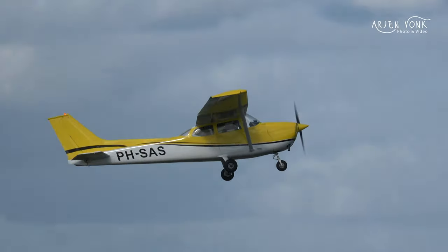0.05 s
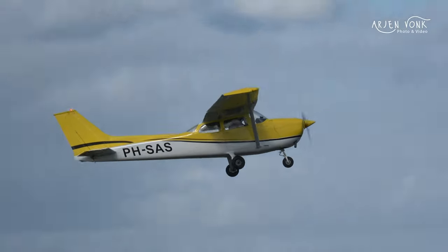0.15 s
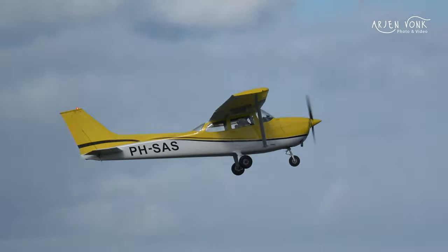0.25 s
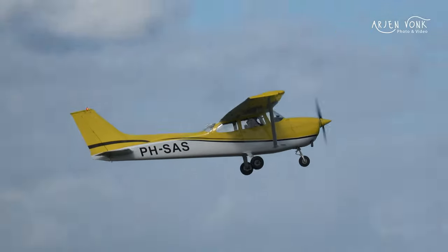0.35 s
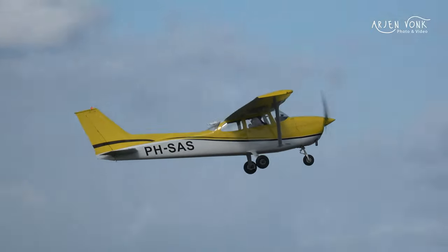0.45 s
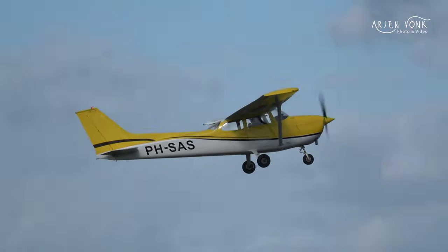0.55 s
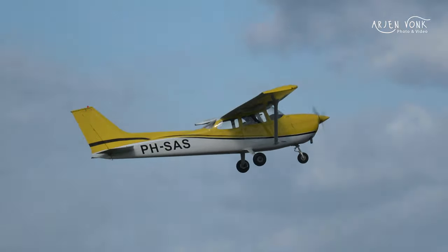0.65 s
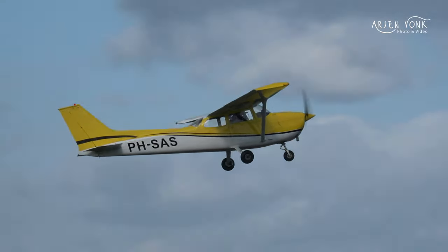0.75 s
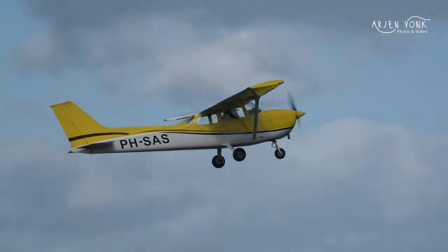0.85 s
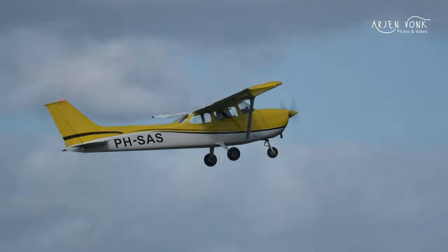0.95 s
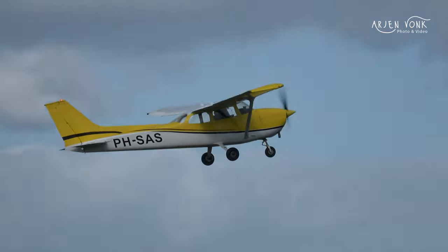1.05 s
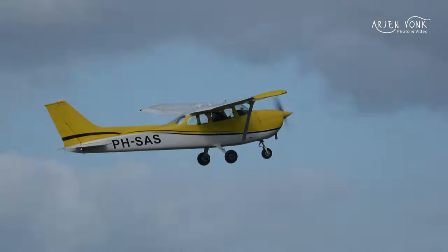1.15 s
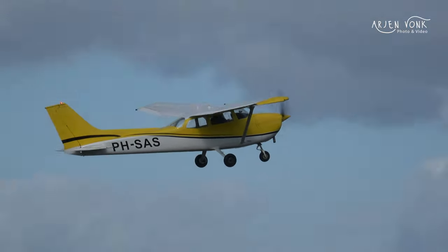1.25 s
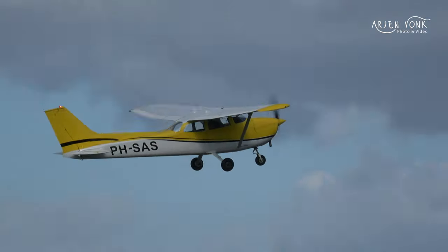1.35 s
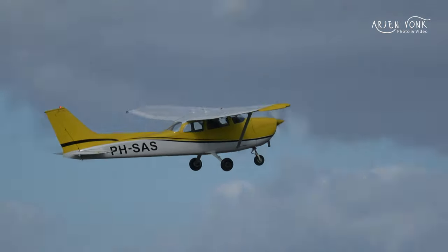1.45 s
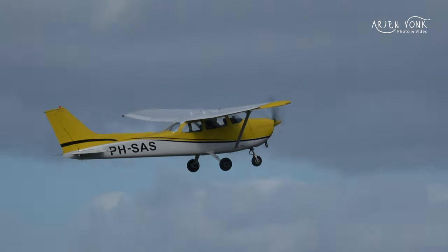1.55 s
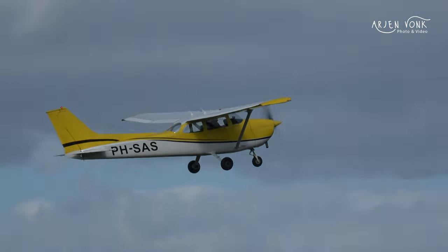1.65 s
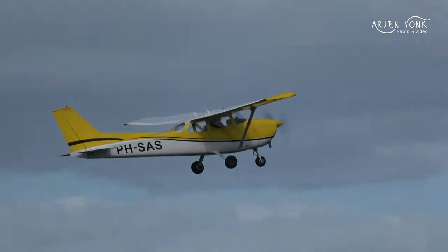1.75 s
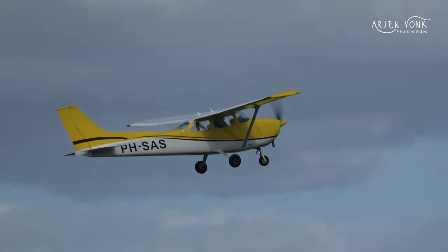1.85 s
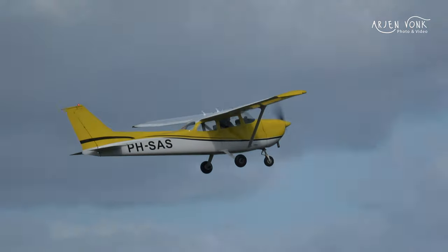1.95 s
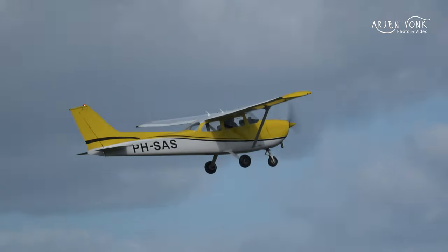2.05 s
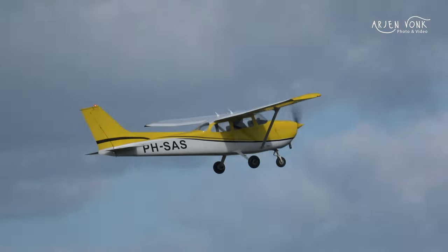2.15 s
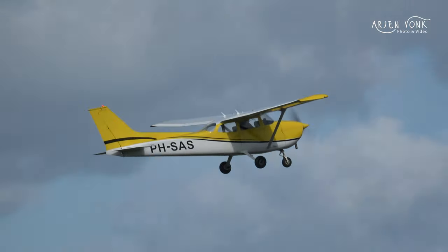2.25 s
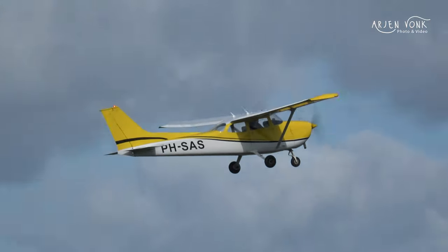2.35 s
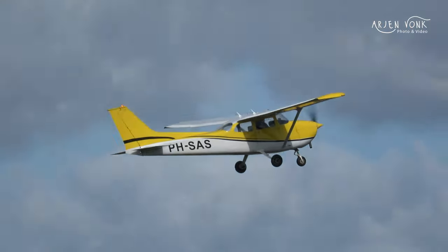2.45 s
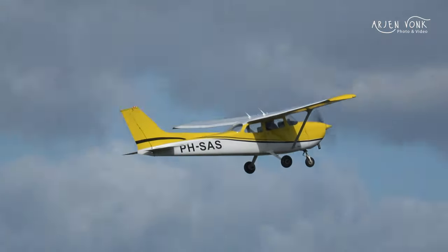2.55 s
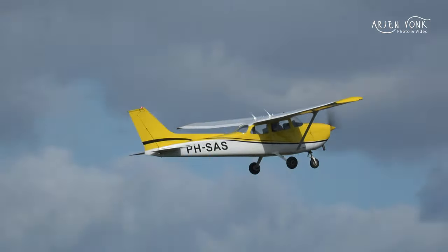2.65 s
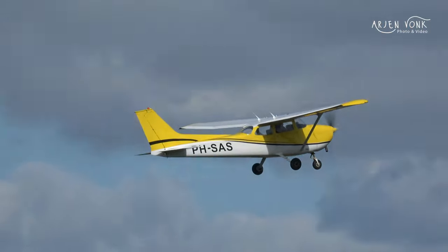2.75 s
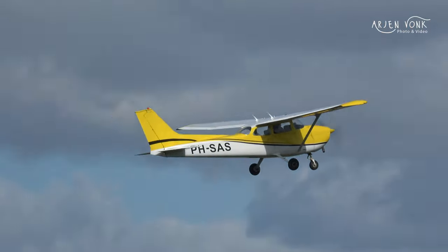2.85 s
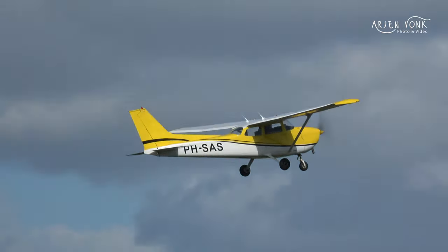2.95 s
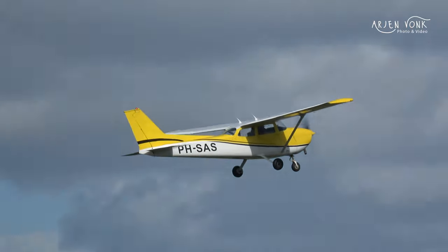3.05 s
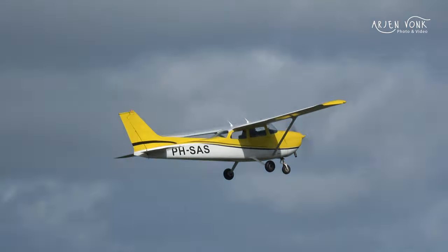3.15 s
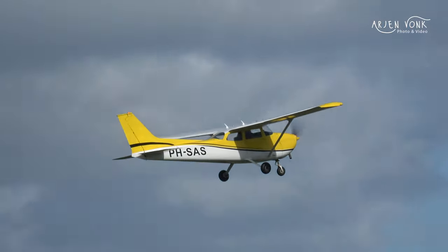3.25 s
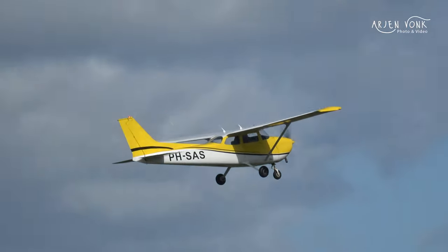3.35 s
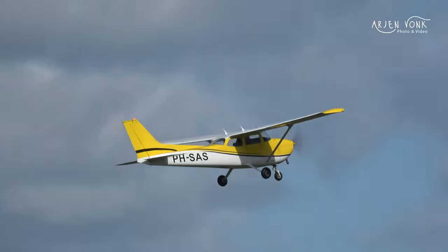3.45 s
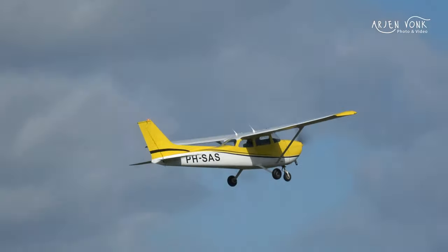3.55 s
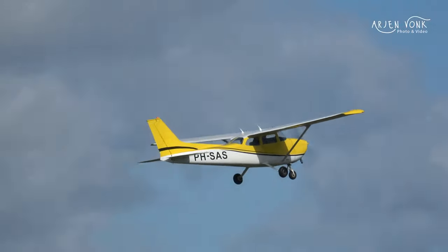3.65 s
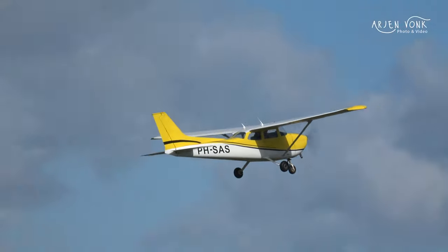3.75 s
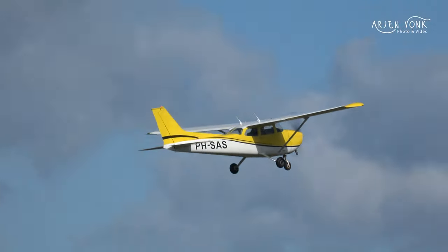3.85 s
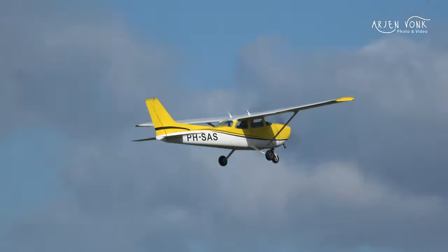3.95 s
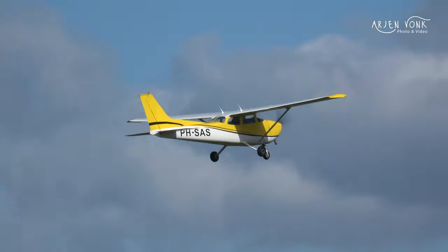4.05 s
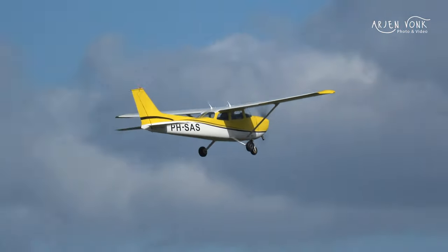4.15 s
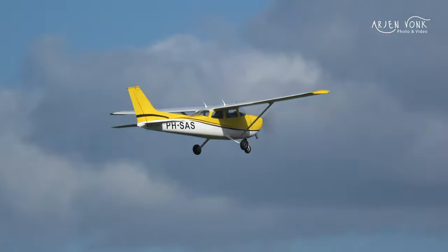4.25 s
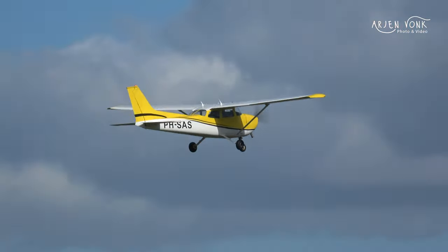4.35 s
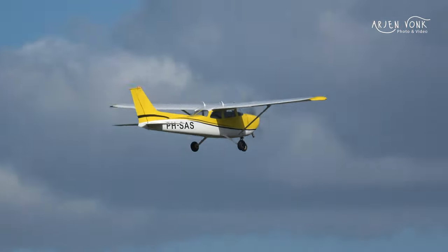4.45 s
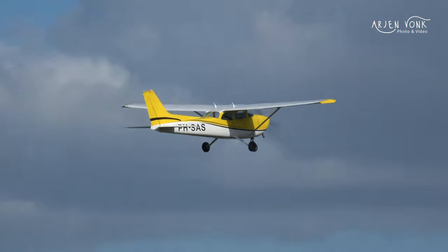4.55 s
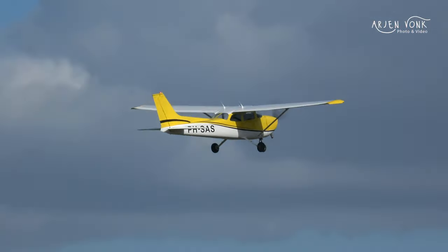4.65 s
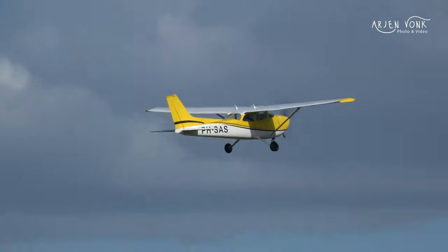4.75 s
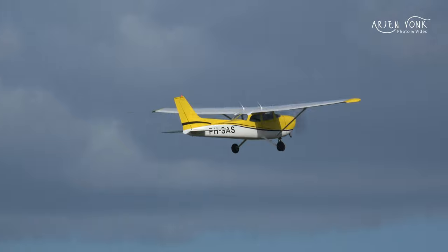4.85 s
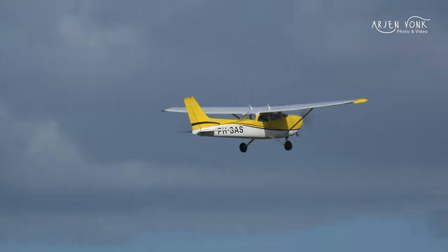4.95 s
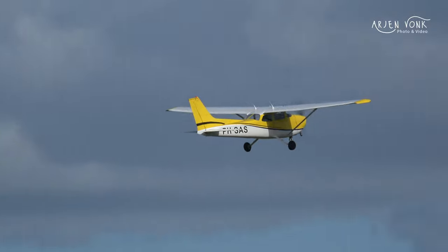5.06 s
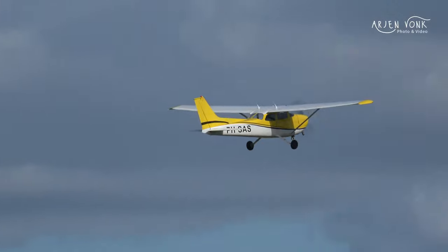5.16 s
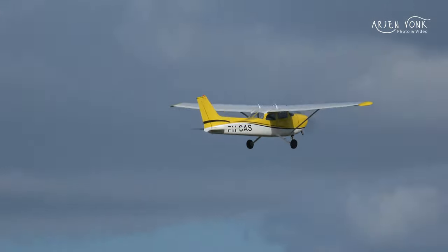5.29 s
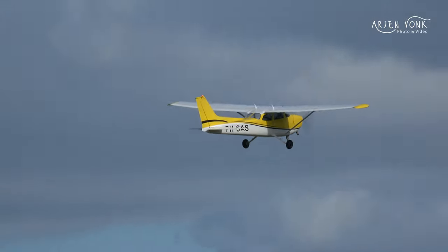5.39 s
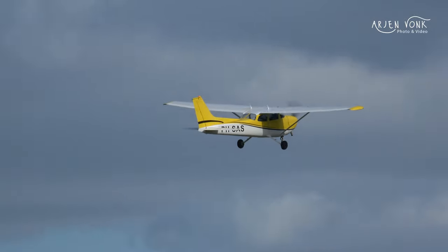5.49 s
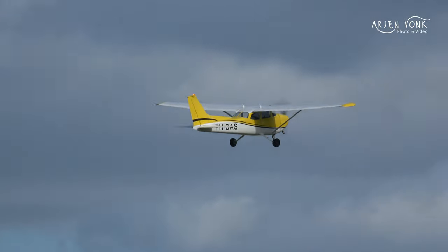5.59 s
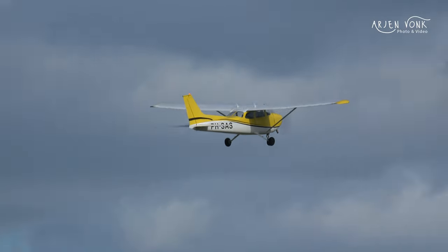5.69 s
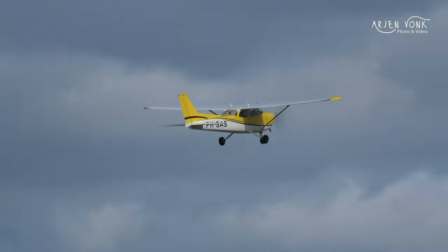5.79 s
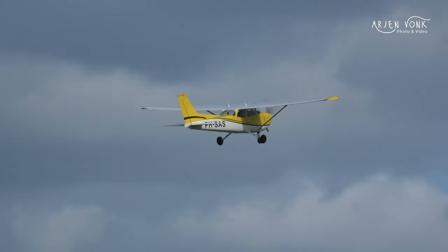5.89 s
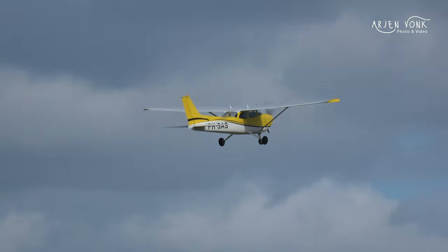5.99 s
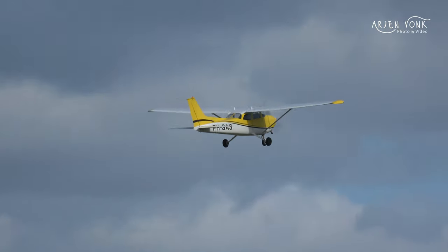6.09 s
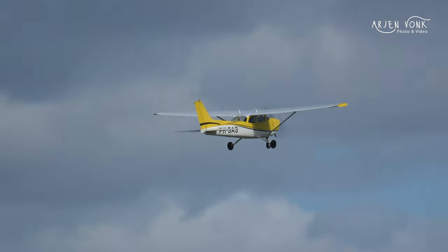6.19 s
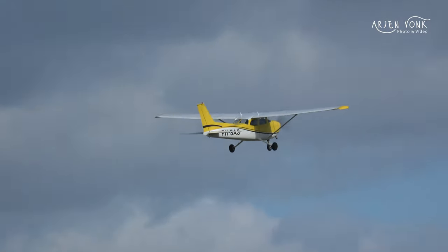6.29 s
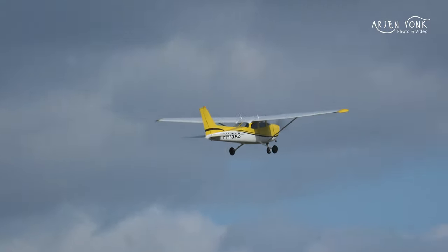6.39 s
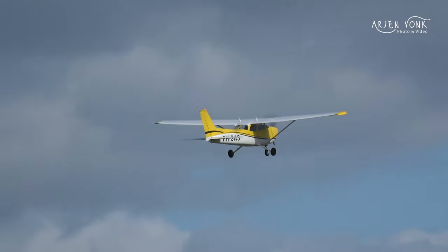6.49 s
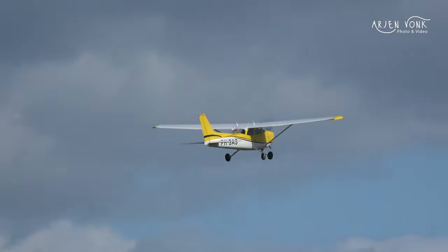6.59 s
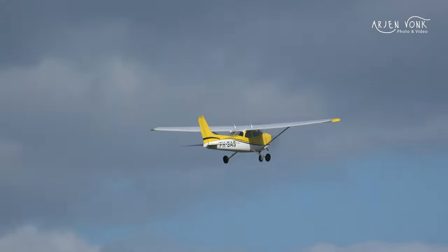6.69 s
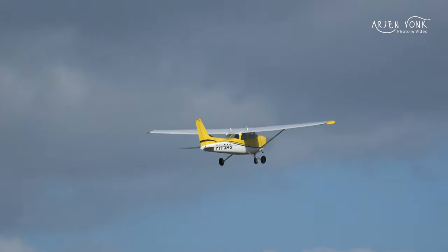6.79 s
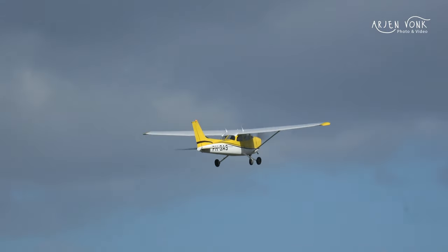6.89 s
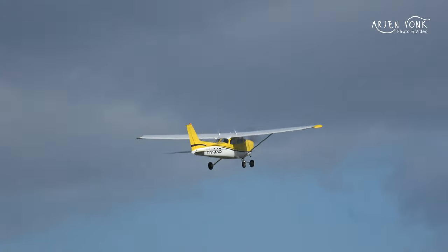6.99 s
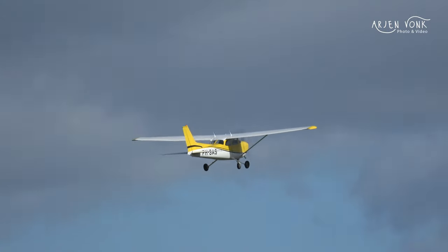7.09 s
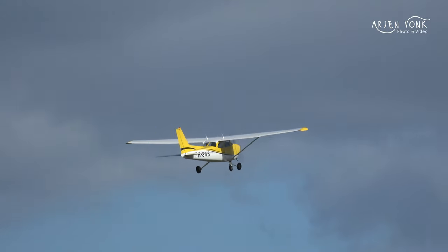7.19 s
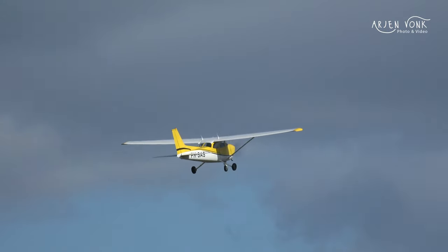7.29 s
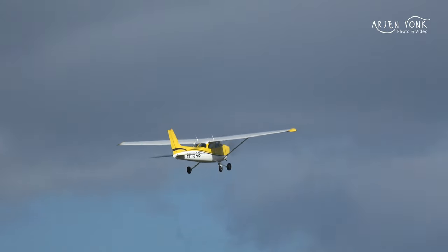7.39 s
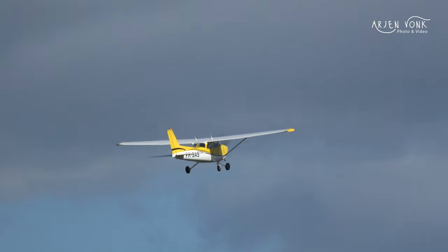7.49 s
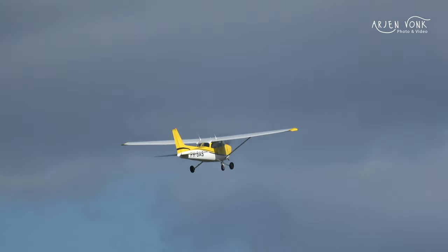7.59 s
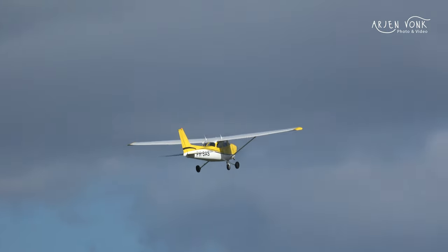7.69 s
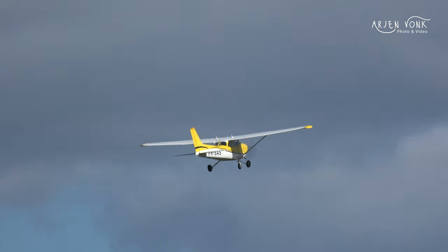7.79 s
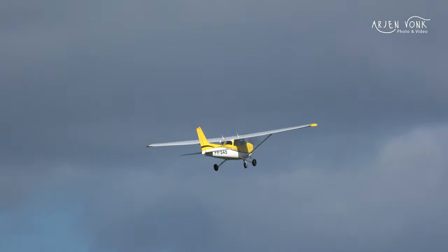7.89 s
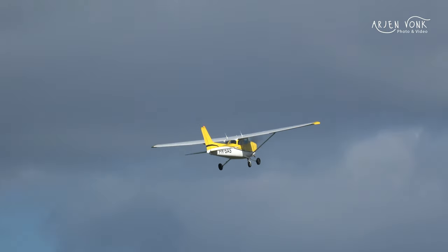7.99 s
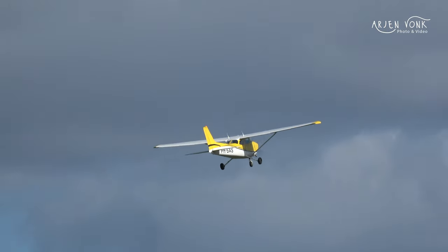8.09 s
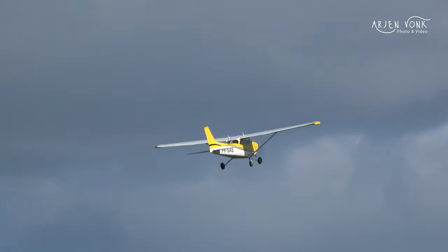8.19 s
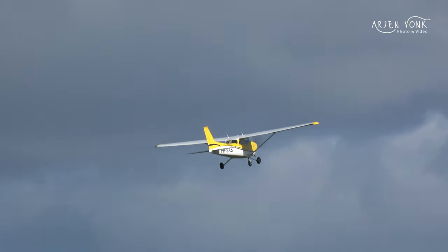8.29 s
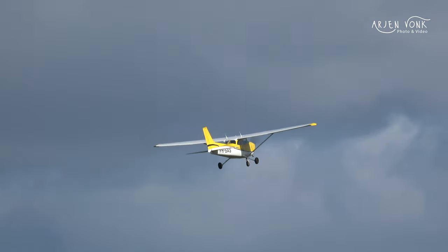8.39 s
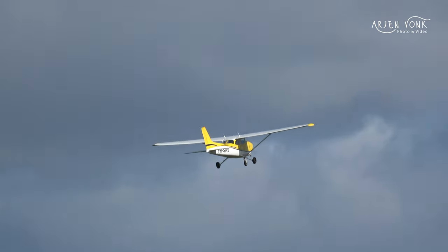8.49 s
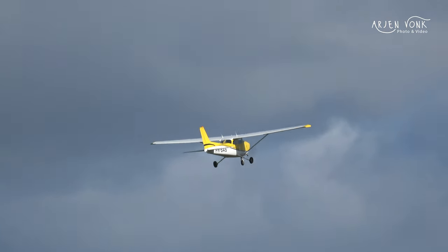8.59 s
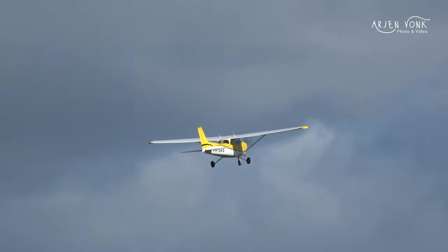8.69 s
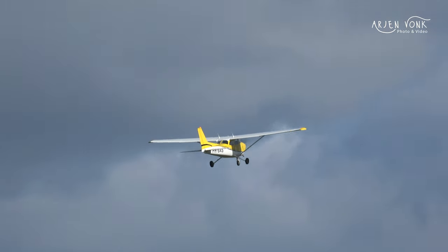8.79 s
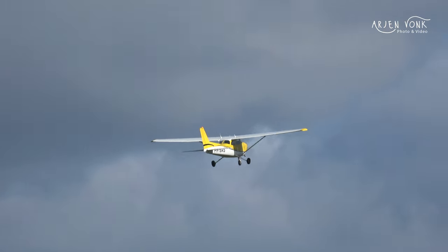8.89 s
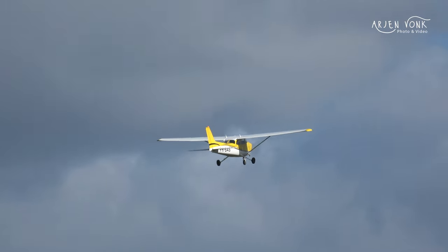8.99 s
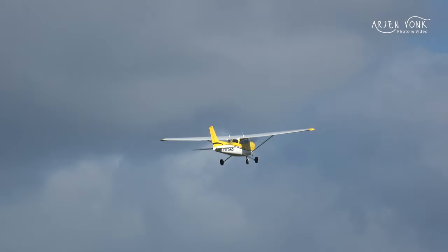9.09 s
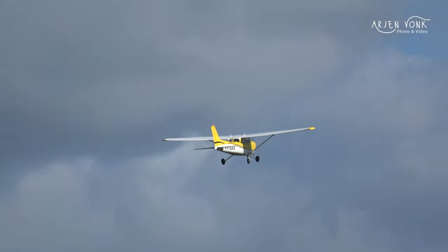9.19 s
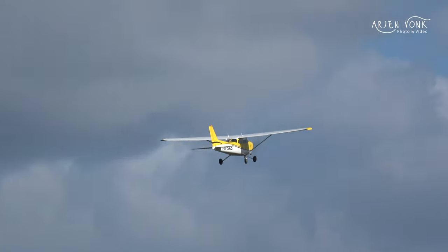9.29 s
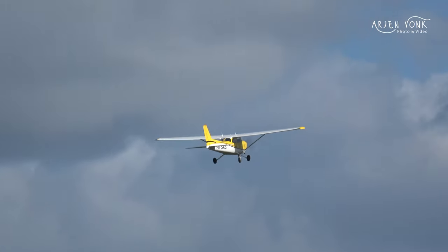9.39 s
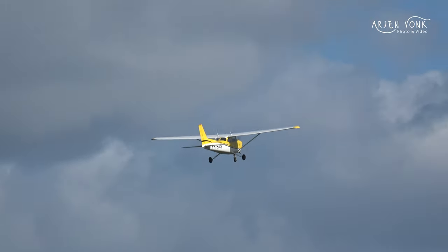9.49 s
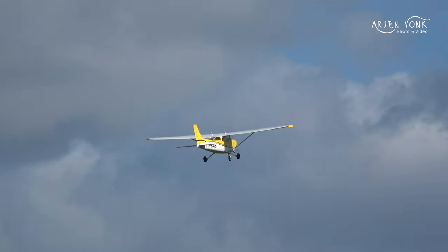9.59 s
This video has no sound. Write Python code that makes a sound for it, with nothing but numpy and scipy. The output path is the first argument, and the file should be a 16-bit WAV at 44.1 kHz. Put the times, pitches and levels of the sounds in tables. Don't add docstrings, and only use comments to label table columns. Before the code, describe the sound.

Loud, rough propeller-plane drone with crackling exhaust passes nearby outdoors, then steadily recedes, wavering in gusty air over faint low wind rumble.

```python
import sys
import numpy as np
from scipy import signal
from scipy.io import wavfile
from scipy.ndimage import uniform_filter1d

SR = 44100
rng = np.random.default_rng(int(sys.argv[2]) if len(sys.argv) > 2 else 0)


def ratio_of_db(decibels):
    return 10 ** (np.asarray(decibels, float) / 20)


def store_pcm(level_fs):
    pcm = np.round(np.clip(level_fs, -1, 1) * 32767).astype(np.int16)
    wavfile.write(sys.argv[1], SR, np.atleast_2d(pcm).T)


N = 425124
STEP = 16

# (time [s], rate [Hz])
BLADE_RATE = [(0.0, 82.8), (1.0, 81.34), (1.5, 80.14), (2.0, 79.81), (3.0, 78.6), (4.5, 76.98), (5.0, 76.6),
              (6.0, 76.69), (7.0, 76.96), (8.0, 76.77), (9.0, 76.03), (9.64, 75.44)]
# (time [s], first harmonic [dB], second re first [dB], higher re first [dB])
HUM = [(0, -15.5, -18.5, -22), (.55, -15.3, -9, -21.5), (.85, -15, -9.5, -23.5), (1.05, -17, -8, -20.5),
       (1.8, -17.5, -4.5, -20.5), (2.3, -19, -15, -26.5), (2.6, -18.5, -9.5, -18), (3.0, -16.5, -9.5, -27),
       (3.7, -17.5, -14.5, -24.5), (4.25, -25, -7, -26), (4.6, -23.5, -14, -16.5), (4.9, -24, -22, -19.5),
       (5.6, -27.5, -12, -23.5), (6.2, -28, -17, -19), (6.7, -31.5, -11.5, -18), (7.2, -29.5, -14, -20),
       (8.0, -33.5, -13, -11.5), (9.64, -34.5, -14, -19)]
# (multiple [-], abeam [dB], from behind [dB])
HIGHER_HARMONICS = [(3, -5.5, 4), (4, 5.5, -1), (5, 2, 4.5), (6, 13.5, -12), (7, -2, 3.5), (8, -6.5, -3.5),
                    (9, -4.5, -11.5), (10, -4, -13.5)]
# (time [s], share [0-1])
AWAY = [
    (0, 0.25),
    (3.6, 0.6),
    (5.4, 0.62),
    (9.64, 1),
]
# (time [s], level [dB])
EXHAUST_LEVEL = [(0, -25.5), (2, -25.5), (4.6, -26.5), (5.4, -32.5), (7.6, -37.5), (9.64, -41.5)]
# (frequency [Hz], abeam [dB], from behind [dB])
EXHAUST_COLOUR = [(101, -17.5, -19), (184, -24.5, -16), (345, -11.5, -5.5), (513, -8, -3.5),
                  (623, -2.5, -4), (865, -12, -0.5), (1090, -6.5, -2.5), (1260, -7.5, -14.5),
                  (1590, -9, -10), (1840, -1, -3.5), (2500, -7, -2.5), (3520, -1.5, 0.5), (5270, 0.5, -1),
                  (9300, -23, -21.5)]
# (frequency [Hz], width [Hz], abeam [dB], from behind [dB])
PIPE_MODES = [(564.8, 25, -13.5, -5.5), (633.6, 27.3, -6.5, -7), (778, 55, -20, -10), (1195, 210, 1.5, -21),
              (1320, 83, -19.5, -12), (1887, 42, -9, -17.5), (3063, 70, -10.5, -14.5),
              (3684, 250, -17, -3.5)]
CYLINDER_DB = [-1.92, -3, -3, -2.5]
REGISTERS_HZ = [
    250,
    680,
    1500,
    3100,
    5200,
]
# (abeam [dB], air loss when far [dB], share of gusts [-])
UPPER_REGISTERS = [
    (-2.5, 3.6, 1.62),
    (-8.5, -10, 1.08),
    (-32.5, -11.5, 1),
]
# (time [s], peak [dB])
POPS = [(0.064, -11), (0.137, -6), (0.332, -1), (0.503, -5.5), (0.575, -12), (0.857, -7), (1.115, -21),
        (1.462, -9), (1.512, -2), (1.624, -10), (1.763, -5.5), (2.413, -13), (2.564, -10), (2.667, -10.5),
        (2.727, -20), (2.843, -14), (2.92, -2), (3.328, -10), (3.481, -8.5), (3.583, -9.5), (3.686, -8),
        (3.995, -18), (4.177, -21), (4.357, -13), (4.462, -11), (4.514, -8), (4.619, -3.5), (4.71, -7),
        (4.878, -10.5), (7.332, -14.5)]
# (time [s], half length [s], low swell [dB], high swell [dB])
GUSTS = [(0.0, 0.063, -12, -1.9), (0.5, 0.037, 4.5, -3), (0.86, 0.078, 8, 4), (1.06, 0.061, -6, -5.5),
         (1.34, 0.062, -7, -7.5), (1.5, 0.022, -4, 5), (1.6, 0.017, -1.8, -3.5), (2.28, 0.086, -8, -6.5),
         (2.54, 0.03, 1.5, -2.7), (2.7, 0.097, -1.8, -4.5), (2.94, 0.029, 1.5, 4.0),
         (3.16, 0.053, -2.0, -7), (3.62, 0.03, -5, -1.8), (3.9, 0.069, -7, -4.5), (4.14, 0.094, -4, 3),
         (4.32, 0.1, 1.5, -5.5), (4.86, 0.1, 0.6, -2), (5.12, 0.14, -10, -3.5), (5.32, 0.026, -6.1, 2),
         (5.7, 0.03, -8, -4.5), (5.96, 0.036, -1, 0), (6.22, 0.26, 2.6, 0.5), (6.52, 0.29, -6.5, -3),
         (6.88, 0.14, 8, 0), (7.52, 0.11, 6, -3.3), (7.72, 0.22, 3.2, 6), (8.1, 0.24, -8, -3),
         (8.32, 0.13, -1, 3), (8.58, 0.068, -3.5, -2.2), (9.18, 0.093, -5, -2)]
# (time [s], half length [s], frequency [Hz], swell [dB])
BAND_SWELLS = [(0.736, 0.23, 820, -6.5), (1.342, 0.041, 1400, 15), (1.89, 0.09, 880, 5.5),
               (2.05, 0.26, 2070, -5), (2.42, 0.14, 2150, 7), (2.625, 0.091, 241, 8.5), (2.842, 0.05, 910, 5.8),
               (2.975, 0.043, 610, 5.5), (2.982, 0.41, 6400, 9.5), (3.32, 0.055, 1840, -4.5),
               (3.54, 0.039, 460, -5.8), (3.76, 0.058, 2430, -6), (4.178, 0.082, 1250, -15.5),
               (4.277, 0.23, 2130, 3.5), (4.69, 0.045, 2130, -11), (4.693, 0.1, 265, -10), (4.748, 0.2, 305, -5),
               (4.79, 0.25, 4200, 4), (4.95, 0.035, 2410, -9), (5.395, 0.12, 700, -7), (5.547, 0.33, 230, 8.5),
               (5.582, 0.054, 400, -14), (5.796, 0.37, 3240, 5), (6.32, 0.1, 1210, -6), (6.947, 0.12, 1480, 12),
               (8.29, 0.09, 3200, -3.5), (8.437, 0.039, 540, -16), (8.55, 0.27, 1210, 7.5), (9.3, 0.28, 2360, 3),
               (9.35, 0.034, 810, -5.5)]
# (time [s], extra path [ms], strength [0-1], low-angle colouring [0-1])
GROUND_ECHO = [(0, 1.34, 0.6, 0.017), (.8, 1.35, 0.24, 0.066), (2.2, 2.07, 0.34, 0.34),
               (3.0, 1.49, 0.14, 0.067), (5.2, 1.66, 0.15, 0.34), (5.9, 1.6, 0.2, 1),
               (7.7, 1.475, 0.16, 0.84), (8.4, 2.3, 0.11, 0), (9.64, 2.24, 0.14, 0.031)]
# (time [s], half length [s], swell [dB])
BUFFETS = [(0.14, 0.04, -10), (0.48, 0.11, -13.5), (0.86, 0.044, -9), (1.8, 0.04, 11), (2.16, 0.03, 12),
           (2.5, 0.094, 7.3), (2.98, 0.18, 3), (3.36, 0.04, 4), (3.58, 0.04, -4), (4.38, 0.12, -8),
           (4.76, 0.087, 5), (4.96, 0.12, 4.5), (5.18, 0.056, 1), (5.64, 0.032, 1), (5.74, 0.07, 2),
           (6.46, 0.082, -1), (6.92, 0.028, 2.5), (7.06, 0.04, -11), (7.58, 0.013, 7), (7.7, 0.055, 0.5),
           (7.98, 0.07, -0.5), (8.68, 0.087, -2)]
# (time [s], peak [dB])
TICKS = [(5.023, -46.5)]


def propeller(turns, away, gust_db):
    first_db, second_db, higher_db = in_time(HUM)
    angle = 2 * np.pi * turns
    flutter_db = (-0.16 + 4.0 * away ** 3) * drift(5.5)
    out = ratio_of_db(first_db + flutter_db) * np.cos(angle)
    out += ratio_of_db(first_db + second_db + 0.97 * drift(2.2)) * np.cos(2 * angle + 0.4)
    for harmonic, (multiple, near_db, far_db) in enumerate(HIGHER_HARMONICS, start=3):
        aspect_db = near_db + away * (far_db - near_db)
        level_db = first_db + higher_db + 0.29 * gust_db + aspect_db + 1.2 * drift(0.8)
        bent = coarse_gain(0.76 * band_swells(89.0 * multiple))
        phase = harmonic * (angle + 0.9) + 0.55 * drift(1.5)
        out += bent * ratio_of_db(level_db) * np.cos(phase)
    return np.sqrt(2) * out


def firings(turns, away):
    opened = turns + 0.39 + 0.5
    cycle = np.cos(2 * np.pi * opened) + 0.08 * np.sin(4 * np.pi * opened)
    return opened.astype(int), -(6.8 - 5.2 * away ** 2) * cycle


def exhaust_levels(away, low_gust_db, high_gust_db):
    plane_db = in_time(EXHAUST_LEVEL)[0]
    growl_db = -26 + 0.43 * (plane_db - plane_db[0]) + 0.22 * low_gust_db
    bark_db = plane_db + 0.77 * low_gust_db
    upper_db = [plane_db + near_db + air_db * away ** 2 + share * high_gust_db
                for near_db, air_db, share in UPPER_REGISTERS]
    return growl_db, bark_db, *upper_db


def cylinder_strength(firing):
    chance_db = 1.49 * rng.standard_normal(firing[-1] + 1)
    return uniform_filter1d(np.array(CYLINDER_DB)[firing % 4] + chance_db[firing], size=150)


def jet(firing, swell_db, away, levels_db):
    white, body, fizz = rng.standard_normal((2, N)), 0, 0
    firing, swell_db, away = firing[::STEP], swell_db[::STEP], away[::STEP]
    levels_db = [level[::STEP] for level in levels_db]
    colour_hz, colour_near_db, colour_far_db = np.transpose(EXHAUST_COLOUR)
    edges_hz = np.geomspace(100, 10500, 24)
    for k, pair_hz in enumerate(zip(edges_hz, edges_hz[1:])):
        hz = np.mean(pair_hz)
        near_db = np.interp(np.log(hz), np.log(colour_hz), colour_near_db)
        far_db = np.interp(np.log(hz), np.log(colour_hz), colour_far_db)
        flicker_db = 2.0 * rng.standard_normal(firing[-1] + 1)[firing]
        patch_db = 2.02 * drift(4.34, step=STEP) + uniform_filter1d(flicker_db, size=9)
        level_db = register(levels_db, hz) + near_db + away * (far_db - near_db) + patch_db
        pulse_db = swell_db * min(hz / 610.0, 1)
        band = rms_one(butter(white[k % 2], pair_hz, "band", order=2)) * coarse_gain(pulse_db + level_db)
        if hz > 4600:
            fizz = fizz + band
        else:
            body = body + band
    fizz = butter(fizz, 5100.0, "high", order=6)
    return body, butter(fizz, 9000.0, "low", order=4)


def tailpipe(firing, swell_db, away, levels_db):
    at = np.flatnonzero(np.diff(firing))
    chance = rng.standard_normal((len(at), len(PIPE_MODES), 2))
    rush, out = 0.045 * ratio_of_db(swell_db) * rng.standard_normal(N), 0
    away, levels_db = away[::STEP], [level[::STEP] for level in levels_db]
    for k, (hz, width_hz, near_db, far_db) in enumerate(PIPE_MODES):
        scatter_s = 0.00015 + hz * 3e-7
        arrival = at + SR * (0.0035 + scatter_s * chance[:, k, 0])
        knocks = rush.copy()
        knocks[np.clip(arrival, 0, N - 1).astype(int)] += ratio_of_db(3.4 * chance[:, k, 1])
        aspect_db = near_db + away * (far_db - near_db)
        level_db = register(levels_db, hz) + aspect_db + 2.53 * drift(3.0, step=STEP)
        ring = resonance(resonance(knocks, hz, 2.5 * width_hz), hz, 2.02 * width_hz)
        out = out + coarse_gain(level_db) * rms_one(ring)
    return out


def pops():
    knocks = np.full(N, 1e-18)
    for s, peak_db in POPS:
        knocks[round((s + 0.0003) * SR)] = -ratio_of_db(peak_db + 33)
    low_ring = resonance(resonance(knocks, 850.0, 800.0), 590.0, 130.0)
    high_ring = resonance(resonance(knocks, 1200.0, 900.0), 1000.0, 400.0)
    return low_ring + ratio_of_db(-14) * high_ring


def ground(direct):
    path_ms, strength, colouring = in_time(GROUND_ECHO)
    late = np.interp(np.arange(N) - path_ms * SR / 1000, np.arange(N), direct)
    both = direct + np.clip(strength, 0, 1) * butter(late, 5200.0, "low", order=1)
    added = 1.1 * resonance(both, 806.0, 61.0) + 0.24 * resonance(both, 1340.0, 82.0)
    added += 0.5 * resonance(both, 611.0, 90.0)
    cancelled = resonance(both, 465.0, 200.0) + 0.28 * resonance(both, 712.0, 85.0)
    cancelled += 0.37 * resonance(both, 1103.0, 200.0)
    return both + np.clip(colouring, 0, 1) * (added - cancelled)


def wind():
    lumps = rng.standard_normal(N) * ratio_of_db(0.87 * drift(4.9))
    rumble = butter(butter(lumps, 83.0, "low", order=2), 38.0, "high", order=3)
    breeze_db = -42 + 0.58 * np.arange(N) / SR
    return ratio_of_db(breeze_db + swells(BUFFETS)[0] + 3.5) * rms_one(rumble)


def tick():
    knock = np.full(N, 1e-18)
    for s, peak_db in TICKS:
        knock[round((s + 0.0015) * SR)] = ratio_of_db(peak_db + 13)
    return resonance(knock, 7800.0, 2500.0) + ratio_of_db(-4.5) * resonance(knock, 14500.0, 2500.0)


def register(levels_db, hz):
    places = range(5) if hz > 4600 else [0, 1, 2, 3, 3]
    place = np.interp(np.log(hz), np.log(REGISTERS_HZ), places)
    below_db, above_db = levels_db[int(place)], levels_db[int(np.ceil(place))]
    return below_db * (1 - place % 1) + above_db * (place % 1) + band_swells(hz)


def band_swells(hz):
    s, half_s, eddy_hz, swell_db = np.transpose(BAND_SWELLS)
    t = np.arange(0, N + 256, 256) / SR
    half_width_octaves = 0.29
    reach_db = 0.83 * swell_db * np.exp(-0.5 * (np.log2(eddy_hz / hz) / half_width_octaves) ** 2)
    bells = np.exp(-0.5 * ((t[:, None] - s) / half_s) ** 2)
    return np.interp(np.arange(0, N, STEP) / SR, t, bells @ reach_db)


def swells(rows):
    s, half_s, *columns = np.transpose(rows)
    t = np.arange(0, N + 64, 64) / SR
    bells = np.exp(-0.5 * ((t[:, None] - s) / half_s) ** 2)
    return [np.interp(np.arange(N) / SR, t, bells @ c) for c in columns]


def drift(rate_hz, step=1):
    r = np.exp(-80 * np.pi * rate_hz / SR)
    slow = signal.lfilter([1], [1, -2 * r, r * r], rng.standard_normal(N // 40 + 2002))[2000:]
    return np.interp(np.arange(0, N, step) / 40, np.arange(len(slow)), rms_one(slow))


def in_time(rows):
    s, *columns = np.transpose(rows)
    return [np.interp(np.arange(N) / SR, s, c) for c in columns]


def coarse_gain(level_db):
    return np.interp(np.arange(N) / STEP, np.arange(len(level_db)), ratio_of_db(level_db))


def resonance(x, hz, width_hz):
    r = np.exp(-np.pi * width_hz / SR)
    poles = [1, -2 * r * np.cos(2 * np.pi * hz / SR), r * r]
    return signal.lfilter([(1 - r * r) / 2, 0, (r * r - 1) / 2], poles, x)


def butter(x, hz, kind, order):
    return signal.sosfilt(signal.butter(order, hz, kind, fs=SR, output="sos"), x)


def rms_one(x):
    return x / np.sqrt(np.mean(x ** 2) + 1e-20)


def scene():
    turns = np.cumsum(in_time(BLADE_RATE)[0]) / SR
    away = np.clip(in_time(AWAY)[0], 0, 1)
    low_gust_db, high_gust_db = swells(GUSTS)
    levels_db = exhaust_levels(away, low_gust_db, high_gust_db)
    firing, swell_db = firings(turns, away)
    strength_db = cylinder_strength(firing)
    body, fizz = jet(firing, swell_db + strength_db, away, levels_db)
    pipe = ratio_of_db(strength_db) * tailpipe(firing, swell_db, away, levels_db)
    exhaust = ground(ratio_of_db(-2.5) * body + pipe + pops())
    exhaust = butter(exhaust, 3746.0, "low", order=12)
    return (propeller(turns, away, low_gust_db) + exhaust + fizz + wind() + tick())[None]


def band_limit(x):
    return signal.sosfilt(signal.butter(12, 15750, fs=SR, output="sos"), x)


def record(dry):
    hiss = ratio_of_db(-77.5) * rng.standard_normal(dry.shape)
    ending = np.minimum(np.arange(N, 0, -1) / (0.004 * SR), 1)
    return band_limit(dry * ending + hiss)


dry = scene()
out = record(dry)
store_pcm(out)
```